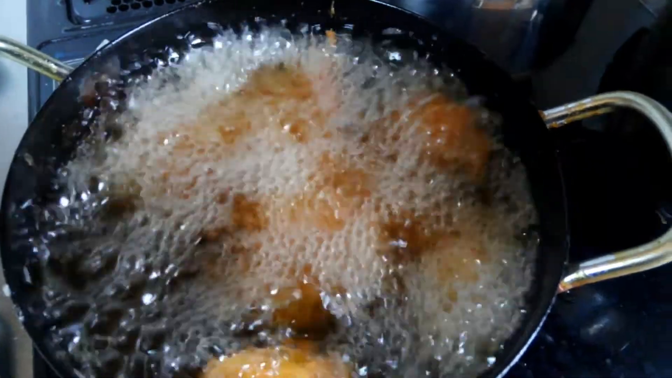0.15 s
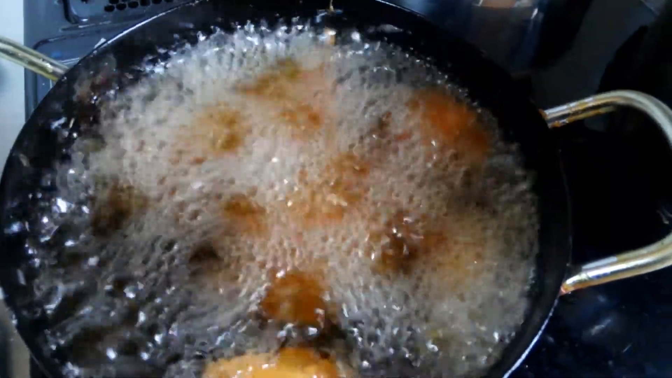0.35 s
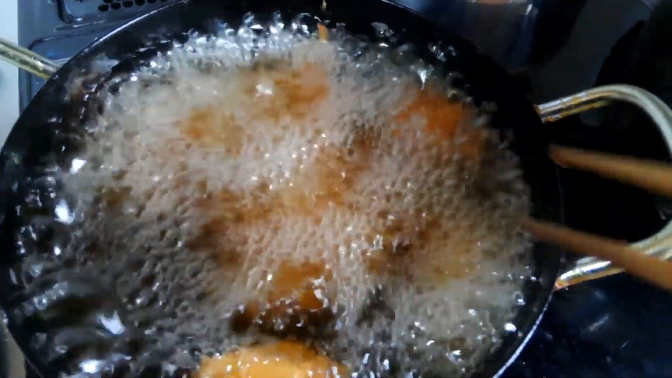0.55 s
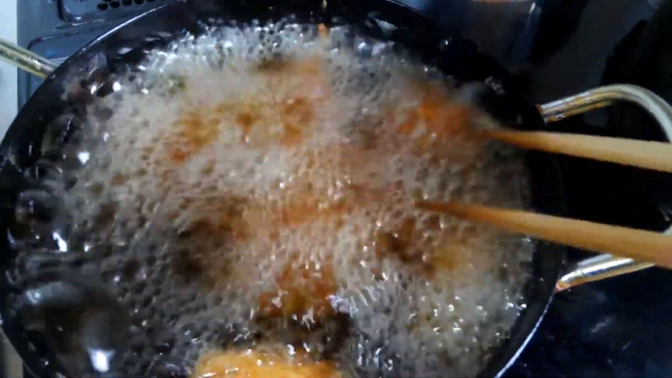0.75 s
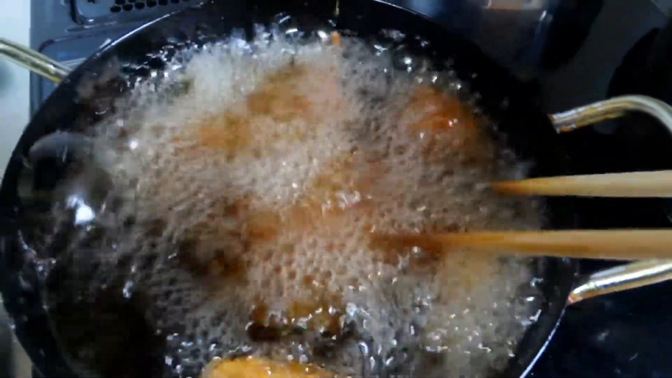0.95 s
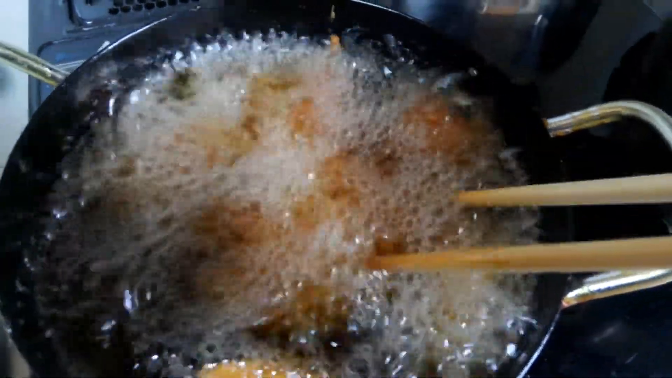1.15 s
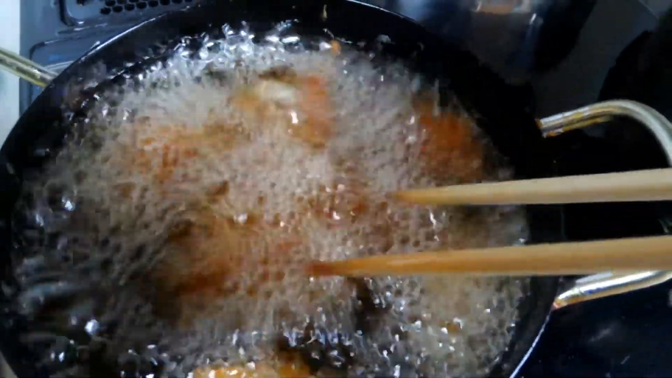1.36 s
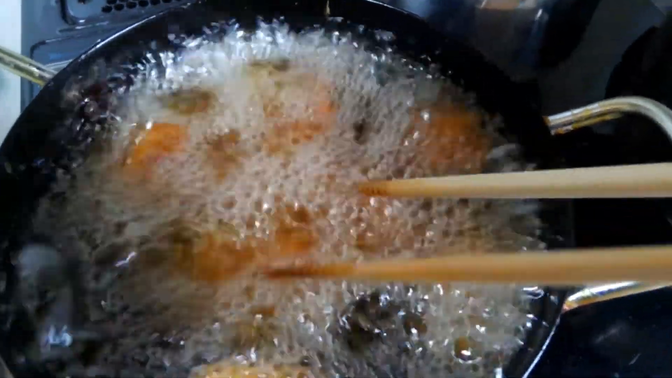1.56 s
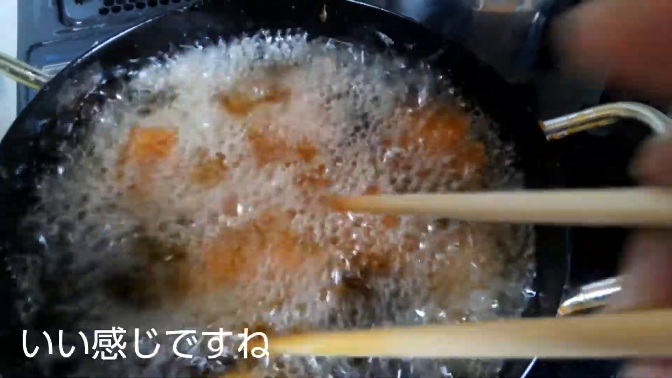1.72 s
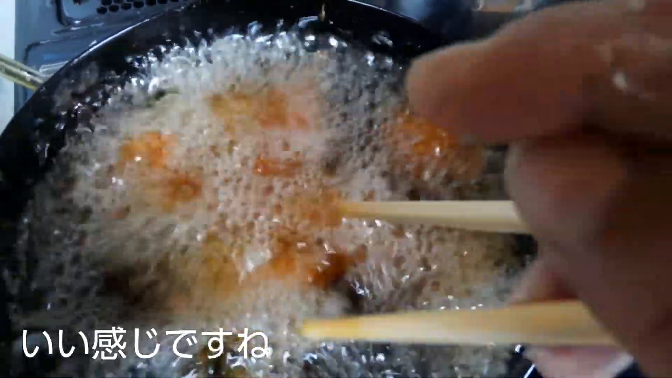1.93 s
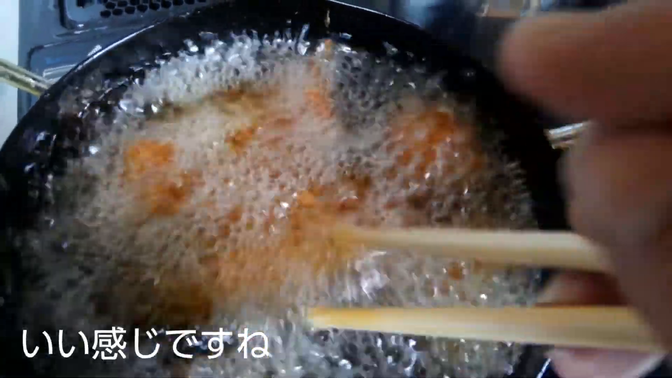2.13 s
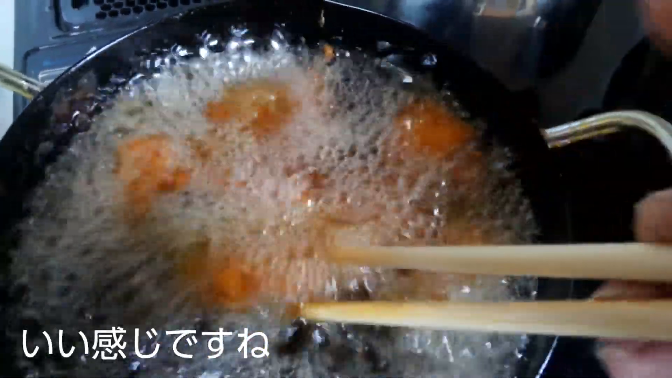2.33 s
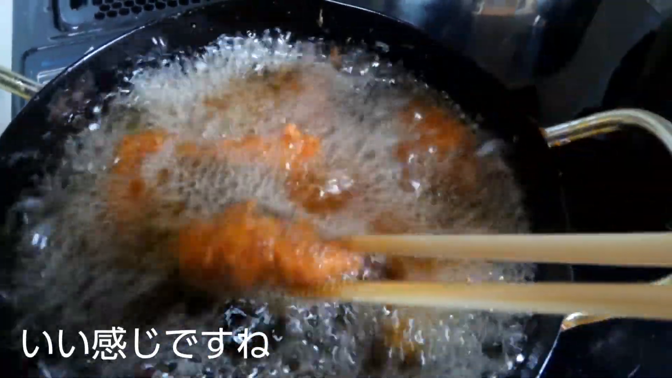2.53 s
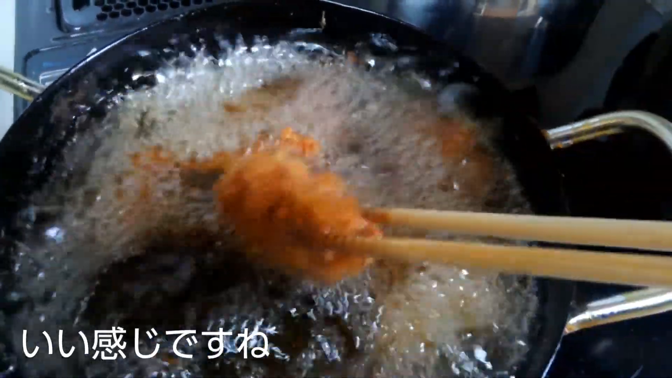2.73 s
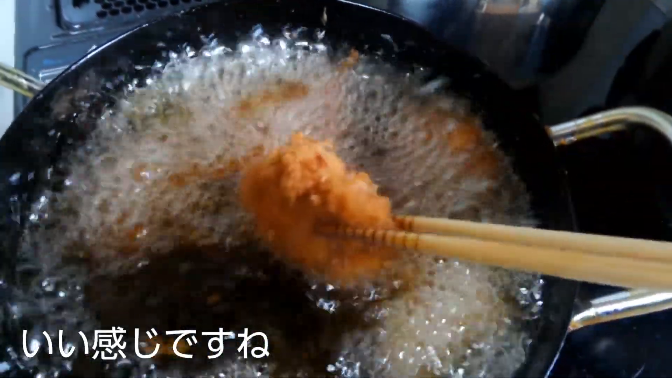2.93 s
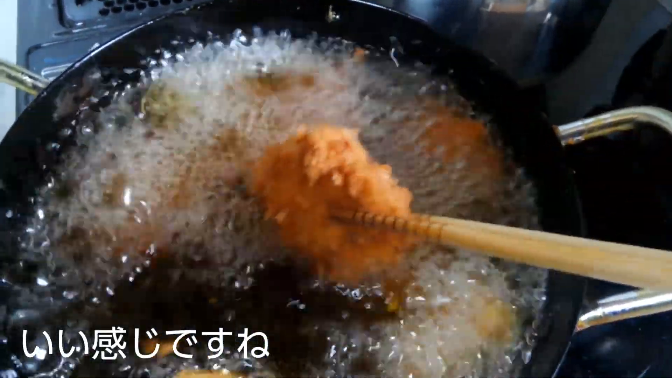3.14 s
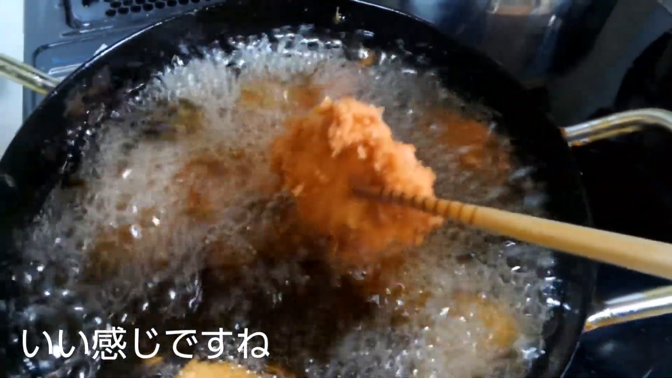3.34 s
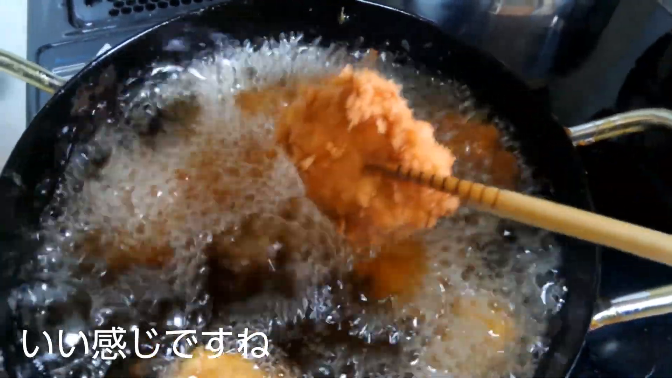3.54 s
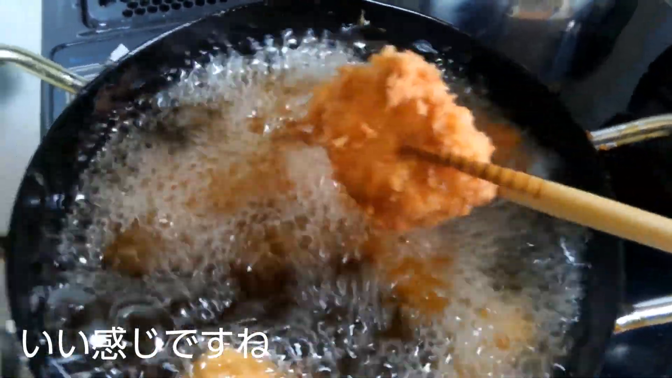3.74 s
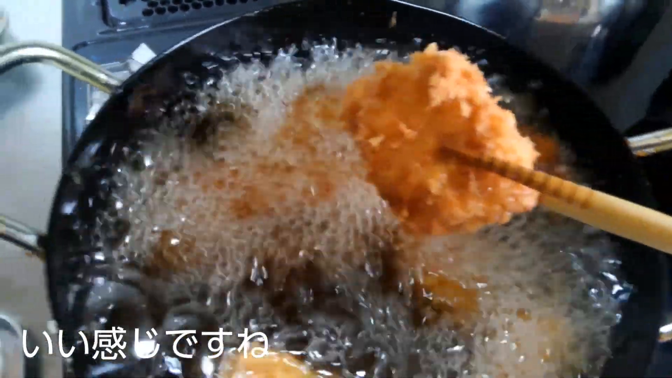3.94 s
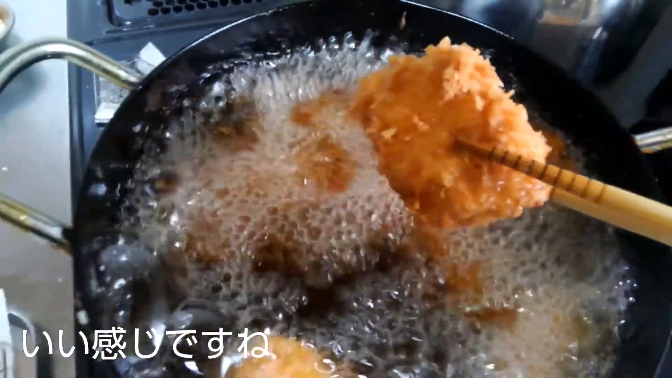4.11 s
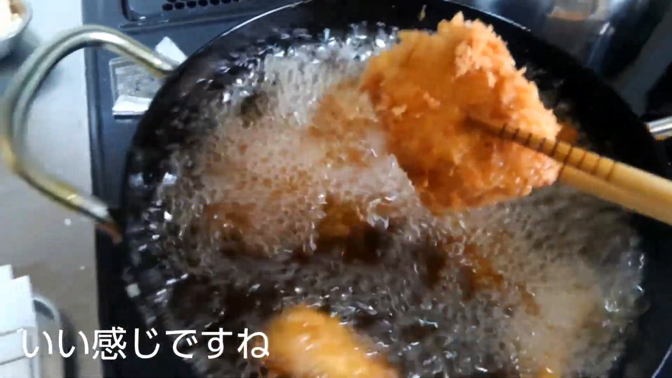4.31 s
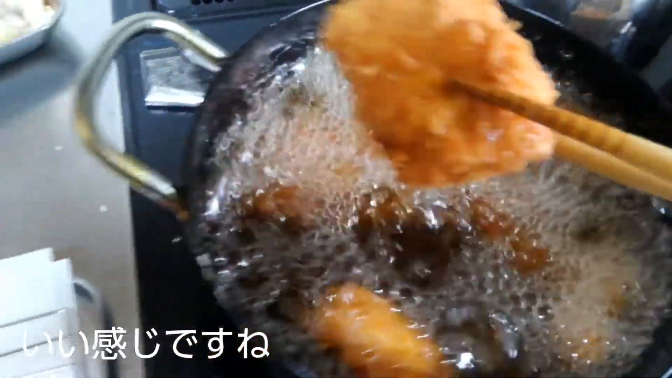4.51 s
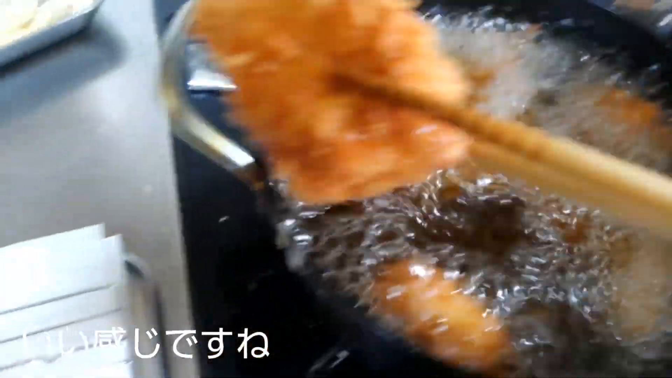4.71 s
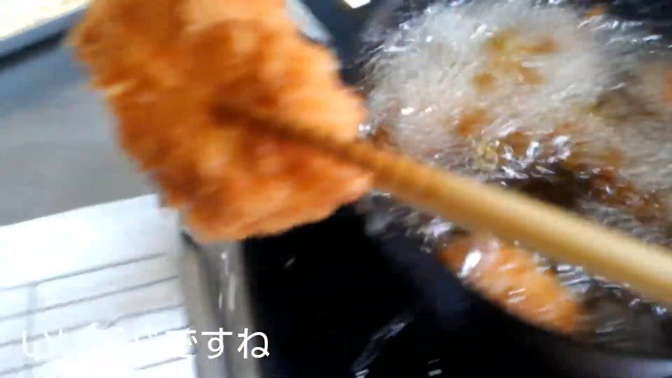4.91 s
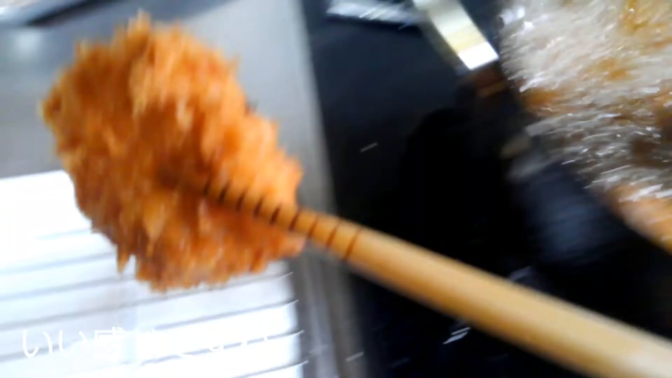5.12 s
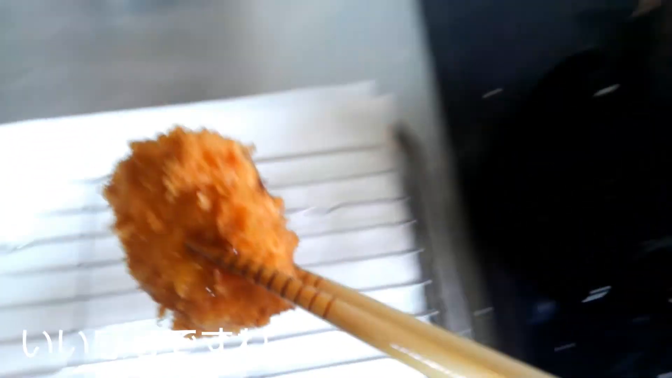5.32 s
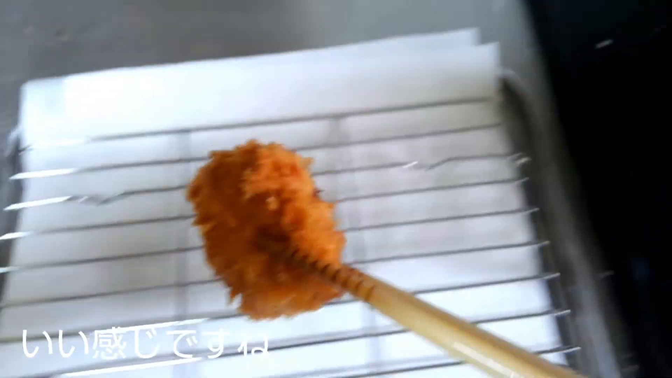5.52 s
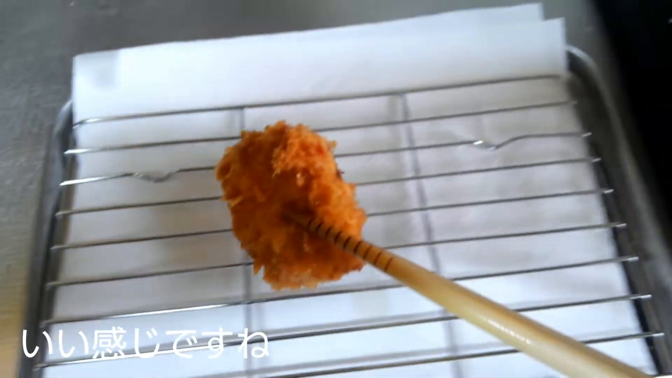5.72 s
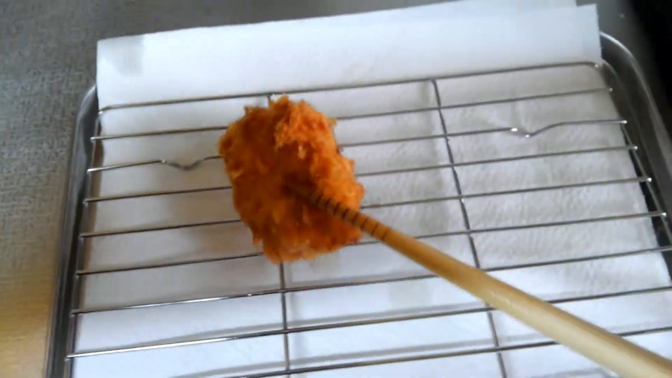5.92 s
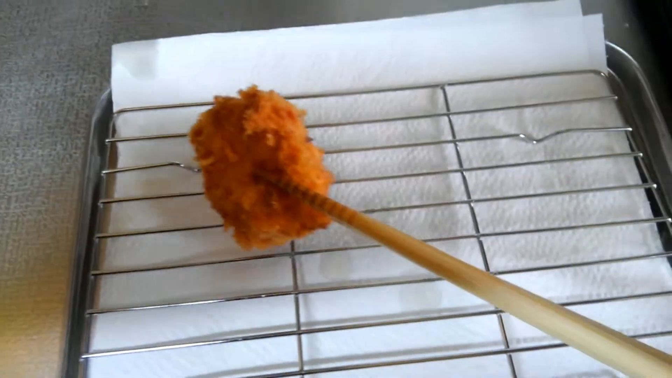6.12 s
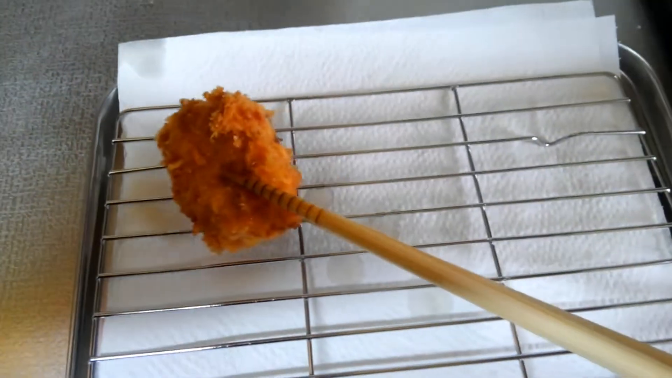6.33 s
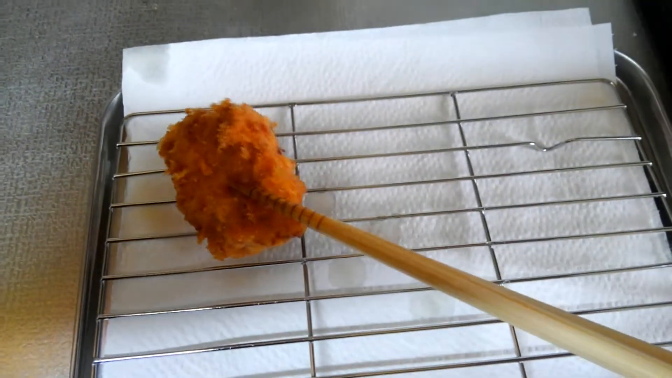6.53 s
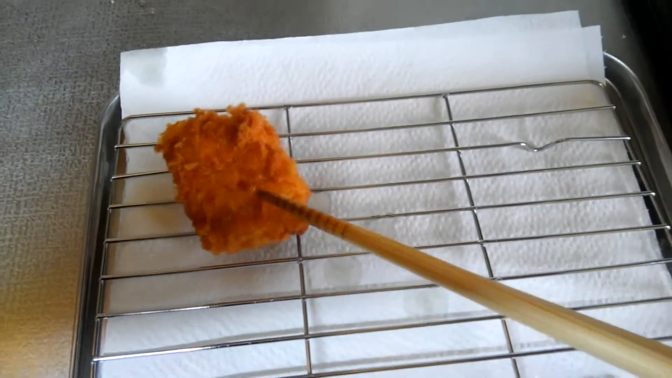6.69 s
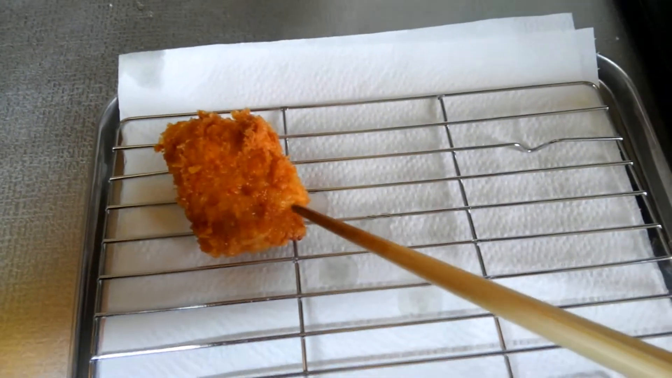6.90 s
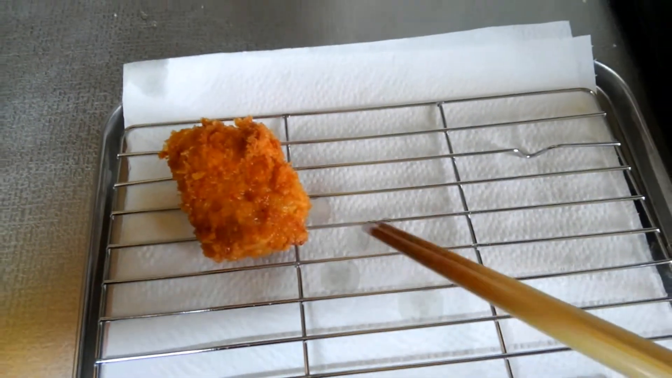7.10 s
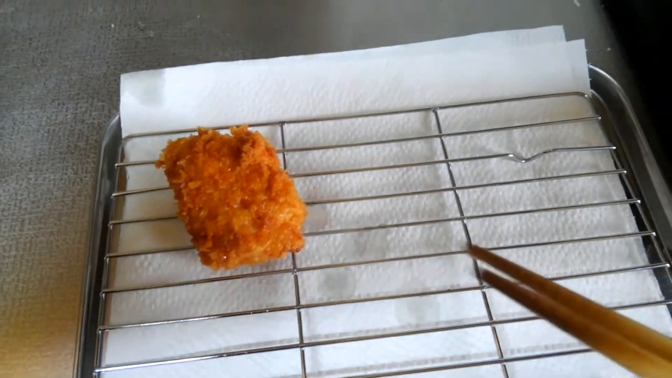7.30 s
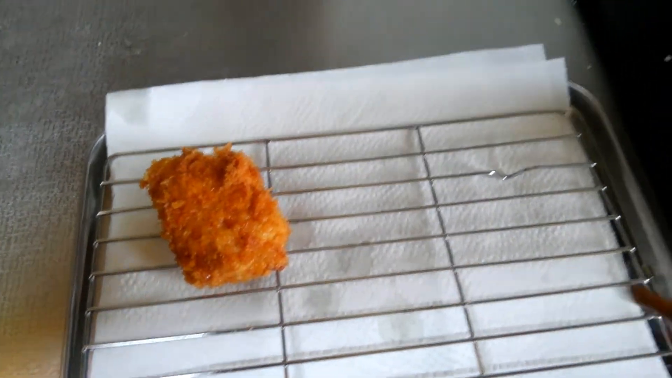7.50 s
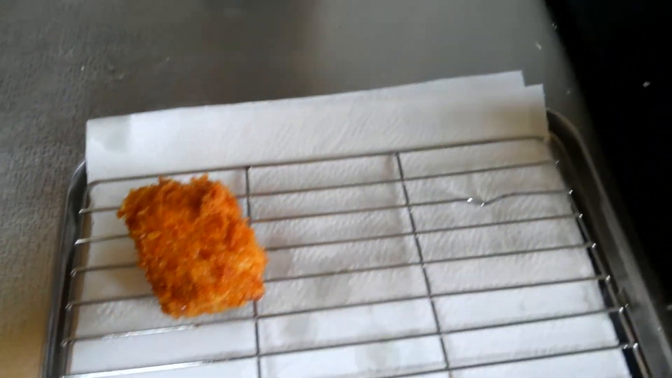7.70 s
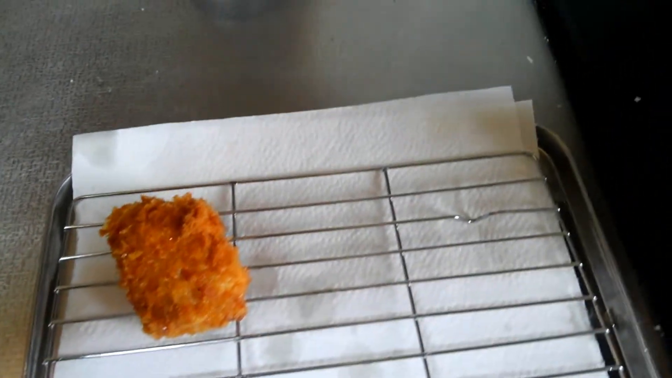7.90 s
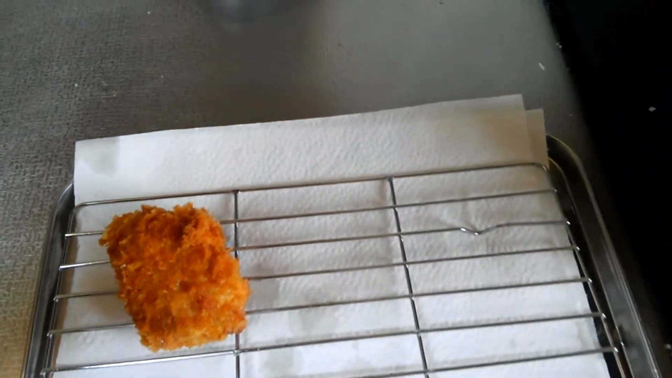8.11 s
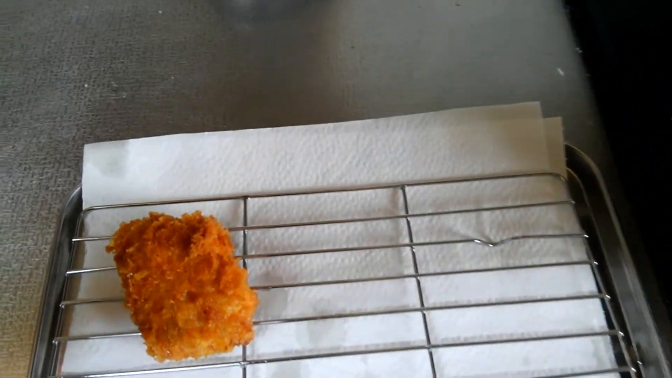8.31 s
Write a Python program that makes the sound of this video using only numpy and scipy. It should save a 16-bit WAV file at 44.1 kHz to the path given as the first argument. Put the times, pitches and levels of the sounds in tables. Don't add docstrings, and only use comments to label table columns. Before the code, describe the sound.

After a brief silence, deep-frying fades in quickly: low bubble pops, high snapping spits and steady fizz, with slight wooden knocks. A dense spray of crackles bursts out when a piece leaves the oil. A handheld close microphone then swings away, so the boil grows duller and quieter in the small dry kitchen, leaving hood rumble, moving air and isolated spits.

```python
import sys
import numpy as np
from scipy import signal
from scipy.fft import rfft, irfft, next_fast_len
from scipy.io import wavfile
from scipy.ndimage import map_coordinates

SR = 44100
rng = np.random.default_rng(int(sys.argv[2]) if len(sys.argv) > 2 else 0)


def transcribe(signal):
    frames = np.atleast_2d(signal).T
    limited = np.clip(frames, -1, 1)
    pcm = np.round(limited * 32767).astype(np.int16)
    wavfile.write(sys.argv[1], SR, pcm)


def decibels_to_gain(level_db):
    exponent = np.asarray(level_db, float) / 20
    return 10 ** exponent


N = 368235

# time_s, pot_level_db, lifted_piece_level_db
OIL_LEVELS = [(0.5, -42, -66), (1.18, -40, -67), (1.39, -40.5, -68), (1.77, -38.5, -55.5),
              (2.18, -39.5, -66), (2.44, -37.5, -44.5), (2.62, -35, -33), (2.85, -37.5, -32),
              (3.12, -38.5, -33.5), (3.3, -34.5, -35), (3.41, -38, -37), (4.54, -41.5, -40.5),
              (5.22, -44, -39.5), (5.62, -46.5, -43.5), (6.2, -46.5, -45), (7.05, -46.5, -45.5),
              (7.4, -43.5, -45.5), (8.35, -45, -50)]
# time_s, hum_level_db, air_level_db
HOOD_LEVELS = [(0.5, -48.5, -53.5), (2.49, -49, -51), (5.86, -50.5, -56.5), (8.35, -49.5, -58)]
# time_s, gain_db
FADE_IN = [
    (0.21, -14.5),
    (0.3, -4),
    (0.4, 1),
    (0.5, 3),
]
# time_s, share_turned (0 to 1)
TURN_AWAY = [
    (4.4, 0),
    (5.5, 1),
]
# time_s, level_db
WHISTLE_SWELL = [(5.6, -1), (5.9, 4), (6.7, 4), (7.3, 3), (7.6, -4)]

# frequency_hz, density_db (per Hz)
BOIL_COLOUR = [(350, -102), (600, -10.5), (1910, 0.5), (2180, 4.5), (4760, -4.5), (6000, -6.5), (7800, -45),
               (13200, -120)]
# frequency_hz, density_db (per Hz)
FIZZ_COLOUR = [(2350, -97), (4000, -8), (5940, -7), (8220, 3.5), (8700, 1), (11500, -14.5), (12500, -19),
               (16200, -23), (22000, -120)]
# frequency_hz, density_db (per Hz)
SPRAY_COLOUR = [(6470, 2), (11000, 9.5), (12600, -21), (14000, 13), (15800, 7.5)]
# frequency_hz, density_db (per Hz)
HUM_COLOUR = [(12, -6), (25, -1.5), (70, -15.5), (110, -3), (142, 2), (205, -15.5), (260, -15),
              (330, -21.5), (580, -26.5), (990, -120)]
# frequency_hz, density_db (per Hz)
AIR_COLOUR = [(180, -37), (300, -25), (430, -13), (775, 1), (936, -5.5), (1070, 1), (1500, 5.5), (1950, 1),
              (3300, -120)]
# pitch_hz, width_hz, level_db (rms), change_once_turned_db
HOOD_TONES = [
    (2125, 20, -58.5, 0),
    (1070, 60, -70, 0),
    (480, 35, -72, -2),
    (395, 25, -76, 0),
    (785, 40, -69, -16),
]
# frequency_hz, decay_s (time to fall 60 dB)
ROOM_DECAY = [(500, 0.1), (2500, 0.062), (8000, 0.033), (15000, 0.012)]
# frequency_hz, gain_db
POP_COLOUR = [(400, -10), (1100, 4), (9500, 3.5), (12500, 3.5), (16000, -15)]
# frequency_hz, gain_db
CRACK_COLOUR = [(700, -30), (1800, 6), (8000, 7), (12000, -14), (16000, -18)]

# crest_s, peak_db, pitch_hz
POT_SPITS = [(0.41, -16, 7600), (0.4811, -9.5, 5120), (0.5176, -17.5, 7800), (0.6672, -13, 8000),
             (0.7541, -17.5, 8260), (0.8664, -10, 7960), (0.9172, -15, 7100), (1.1911, -11.5, 8200),
             (1.2156, -13.5, 7460), (1.3216, -11.5, 7750), (1.6435, -13.5, 6940), (1.8693, -8.5, 6160),
             (1.9767, -15, 5300), (2.126, -10.5, 5470), (2.244, -16, 6000), (2.4307, -9.5, 8200),
             (2.4526, -7, 8400), (4.5587, -19, 5020), (4.6611, -13.5, 7400), (4.9795, -14, 7450),
             (5.1048, -14, 8100), (5.1767, -9.5, 7560), (5.6194, -11.5, 7300), (5.7978, -16, 6600),
             (5.837, -13, 7260), (6.4841, -12, 7100), (6.6298, -12, 7000), (6.858, -15, 7440),
             (6.8826, -3.5, 7860), (7.4047, -13, 7600)]
# crest_s, peak_db, pitch_hz
LIFTED_SPITS = [(2.5781, -8, 6550), (2.5875, -10, 7040), (2.6, -4, 7850), (2.647, -8, 7850),
                (2.6614, -1.5, 7540), (2.6634, 4, 8270), (2.762, -13, 5840), (2.806, -9.5, 8250),
                (2.845, -4, 8660), (2.853, -9, 8400), (2.8602, -8, 8300), (2.931, -9, 8350),
                (2.9587, -8, 6900), (2.965, -11, 8550), (3.049, -9, 8500), (3.0772, -4.5, 8200),
                (3.106, -8, 8900), (3.1328, -9, 5660), (3.1424, -5.5, 7060), (3.1485, -5.5, 8200),
                (3.172, -9, 7850), (3.2044, -6.5, 7740), (3.2413, -4.5, 8200), (3.323, -5.5, 8850),
                (3.4537, -10, 6350), (3.6776, -6.5, 6150), (3.7822, -15, 8200), (3.972, -13, 7500),
                (4.165, -15, 8800), (4.2123, -17, 7300)]
# crest_s, peak_db, pitch_hz
DRAINING_SPITS = [(0.228, -29, 7600), (0.266, -29, 6800), (0.599, -18, 8600), (0.3614, -18, 8900),
                  (0.6634, -16.5, 6040), (0.8447, -16.5, 8300), (1.071, -21, 10000), (1.3162, -14.5, 8600),
                  (3.3038, -12, 6450), (3.4046, -15, 8300), (3.447, -12, 7500), (3.554, -18, 8400),
                  (3.5928, -11.5, 7870), (3.6049, -14, 6000), (3.637, -14, 7970), (3.6497, -13, 5760),
                  (3.659, -13, 8900), (3.684, -10, 7360), (3.7346, -14, 8100), (3.8661, -17, 6260),
                  (3.9517, -15, 8100), (3.966, -16, 7820), (3.9793, -11, 7960), (3.986, -13.5, 5700),
                  (3.992, -13, 7500), (4.199, -12.5, 7200), (4.2042, -15, 7500), (4.2338, -17, 9500),
                  (4.2767, -13, 7800), (4.36, -14, 7840)]
# crest_s, peak_db, pitch_hz
MIDDLING_SPITS = [(0.4243, -21, 6840), (0.7946, -24, 5860), (0.8574, -24, 6400), (0.885, -19, 7600),
                  (1.0407, -25, 7300), (1.0978, -17.5, 6400), (1.1622, -19.5, 5750), (1.2626, -22, 4830),
                  (1.3727, -18.5, 6340), (1.6729, -25, 10000), (1.6811, -18, 6960), (1.838, -14.5, 8250),
                  (1.8493, -16, 6670), (2.1032, -18, 7500), (2.1194, -18, 6270), (2.1604, -21, 5170),
                  (2.1955, -12, 6530), (2.32, -18, 7900), (2.4098, -16, 5400), (2.496, -13.5, 6240),
                  (2.5072, -14, 7260), (2.704, -11, 8200), (2.762, -14, 7900), (2.9584, -10, 8440),
                  (2.984, -15, 8680), (3.0401, -17, 8290), (3.0897, -17, 8570), (3.1258, -13, 8000),
                  (3.1785, -16, 8030), (3.3369, -27, 8440), (3.4293, -15, 8000), (3.4883, -21, 7860),
                  (3.5985, -18, 8630), (3.6639, -14, 7950), (3.7602, -17, 7000), (3.7942, -16, 9300),
                  (3.8581, -17, 7800), (3.8737, -16, 8760), (3.958, -19, 7820), (4.0308, -12, 7400),
                  (4.0575, -16, 7650), (4.2492, -16, 7350), (4.331, -13, 7900), (4.4714, -22, 8810),
                  (4.4783, -16, 8360), (4.6128, -18, 5450), (4.6837, -15, 7750), (4.768, -14.5, 7900),
                  (4.8854, -18, 7350), (4.969, -12, 7600), (5.0942, -17, 8200), (5.136, -17, 6240),
                  (5.3557, -18, 8200), (5.4117, -14.5, 7260), (6.153, -14.5, 7740), (6.207, -20, 7100),
                  (7.457, -18, 7050), (8.1398, -22, 7210)]
# crest_s, peak_db, pitch_hz
QUIET_SPITS = [(0.395, -27, 8720), (0.4871, -21, 8500), (5.872, -16, 7840), (5.9722, -22, 8790),
               (6.6987, -20, 5400), (6.7671, -15, 8000), (6.9076, -19, 6700), (7.0106, -19, 5370),
               (7.1862, -27, 7560), (7.2232, -19, 6600), (7.2461, -24, 7430), (7.3425, -18, 8000),
               (7.6006, -29, 6740), (7.7427, -25, 7160), (7.7815, -17.5, 6780), (7.7948, -16, 7300),
               (7.8074, -26, 4890), (8.1075, -21, 5300), (8.1259, -21, 6400), (8.2712, -29, 7100)]
# crest_s, peak_db, pitch_hz
NEAR_BUBBLES = [(0.434, -20, 2870), (0.5302, -14.5, 4330), (0.547, -22, 2900), (0.7946, -14.5, 2670),
                (0.9544, -19, 2460), (1.0963, -14.5, 3740), (1.3686, -18, 2830), (1.5826, -11.5, 3200),
                (1.65, -21, 4200), (1.748, -22, 4930), (1.8098, -17.5, 2900), (1.9443, -21, 4260),
                (1.9832, -9.5, 2780), (2.2484, -14.5, 2750), (2.2722, -15.5, 2320), (2.373, -17.5, 3870),
                (2.4978, -18, 2800), (2.5223, -15.5, 2600), (2.5982, -8.5, 3660), (2.6232, -12, 3370),
                (2.6817, -15, 3700), (2.6893, -11, 2850), (2.7788, -16, 2070), (3.2406, -13.5, 4200),
                (3.3214, -13.5, 2900), (3.3425, -26.5, 1700), (3.4481, -24, 1770), (3.4531, -15, 2580),
                (3.5677, -7, 4100), (3.7433, -14, 4200), (3.78, -12, 2460), (3.8849, -15, 2700),
                (3.886, -16.5, 1670), (3.9366, -18, 2120), (4.1503, -19.5, 1550), (4.4315, -19, 4400),
                (4.438, -15.5, 2860)]
# crest_s, peak_db, pitch_hz
TURNED_BUBBLES = [(0.2867, -27.5, 2650), (0.732, -21, 4040), (8.159, -26, 1860), (4.343, -23, 3580),
                  (4.357, -19, 3270), (4.379, -25.5, 1500), (4.5006, -21.5, 2540), (5.825, -25, 2620),
                  (5.876, -27, 2780), (6.186, -28, 1760), (4.482, -17.5, 3170), (4.559, -22, 4500),
                  (4.8859, -23, 4140), (5.002, -23, 1950), (5.169, -18.5, 2920), (5.343, -19.5, 2350),
                  (5.4125, -19, 1760), (5.799, -24, 2770), (5.8614, -22.5, 2100), (6.1981, -25, 2100),
                  (6.6296, -19, 2830), (6.646, -19.5, 1850), (6.857, -19.5, 2780), (6.8825, -16, 3040),
                  (7.3564, -15.5, 2340), (7.407, -20.5, 2500), (7.5192, -14.5, 2080), (7.6502, -17.5, 2550),
                  (7.714, -19, 3770), (7.808, -15, 2580), (8.0686, -15, 2660)]
# crest_s, peak_db, pitch_hz
MIDDLING_BUBBLES = [(0.4178, -26, 2910), (0.6217, -22, 2860), (0.9174, -22, 3430), (1.141, -25, 2520),
                    (1.156, -26, 2700), (1.177, -24, 3230), (1.2003, -22, 2650), (1.397, -20, 2870),
                    (1.41, -21, 4260), (1.5187, -19, 2970), (1.551, -20, 2330), (1.703, -23, 3000),
                    (1.998, -26, 3600), (2.117, -16, 4140), (2.223, -20.5, 4200), (2.3371, -19.5, 2720),
                    (2.3933, -20, 3960), (2.4898, -19, 2430), (2.6476, -18, 3500), (2.667, -14, 2890),
                    (2.7039, -17, 3320), (2.7363, -21, 3320), (2.8595, -19.5, 2530), (3.013, -21, 2820),
                    (3.106, -18.5, 4370), (3.142, -21.5, 3040), (3.1895, -26, 2860), (3.2583, -23, 1770),
                    (3.286, -24.5, 1660), (3.2967, -23, 2410), (3.3813, -18.5, 4070), (3.4872, -21, 3530),
                    (3.5251, -29, 4220), (3.675, -17.5, 3600), (3.7712, -23, 2130), (3.8342, -24, 2950),
                    (3.8416, -23, 3100), (3.942, -26, 3100), (4.1567, -25, 1600), (4.4698, -20, 3030),
                    (4.6658, -23, 2170), (4.8536, -25.5, 1680), (4.967, -30, 2920), (4.974, -22, 3750),
                    (5.2188, -25, 2800), (5.376, -20, 2730), (5.39, -22, 4020), (5.4253, -25, 2940),
                    (6.1279, -24.5, 2900), (6.596, -33, 2840), (7.291, -21.5, 3010), (7.4635, -20, 3070),
                    (7.5655, -20.5, 2580), (7.8313, -25, 2700)]
# crest_s, peak_db, pitch_hz
QUIET_BUBBLES = [(0.3103, -29, 2860), (0.357, -27, 3340), (1.3189, -27, 2270), (5.6521, -23, 3240),
                 (5.7906, -25, 3270), (5.822, -23, 2200), (5.926, -26, 2760), (6.673, -22.5, 2880),
                 (6.9627, -26.5, 2380), (7.2124, -25.5, 2860), (7.247, -28, 2280), (7.3068, -31, 2540),
                 (8.0753, -27, 2760), (8.316, -24, 2900)]
# crest_s, peak_db
DROPLETS = [(0.598, -19), (0.8505, -29), (1.2151, -25), (1.8693, -20), (2.4304, -16), (2.4522, -27),
            (2.587, -13), (2.6473, -12), (2.9644, -17), (2.985, -16), (3.1071, -9), (3.1328, -15),
            (3.1887, -16), (3.4543, -20), (3.5923, -19), (3.6825, -17), (3.7341, -18), (3.9793, -20),
            (4.1642, -24), (4.2117, -19), (4.3509, -24.5), (5.6193, -24), (5.7979, -18), (6.208, -31),
            (6.63, -29), (6.768, -33.5)]
# start_s, peak_db
EXPLOSIONS = [(0.7923, -23), (2.8436, -24), (3.1715, -23), (4.885, -20.5), (5.2385, -39), (5.452, -25),
              (6.181, -28), (6.218, -28), (6.4845, -31), (6.5966, -22), (6.6296, -19.5), (6.8577, -19),
              (6.8822, -14.5), (7.591, -31)]
# crest_s, peak_db, pitch_hz
KNOCK_HITS = [(2.0291, -32, 261), (2.03, -33.5, 520), (2.0291, -21, 1040), (2.664, -17, 1300),
              (3.3297, -29, 970), (4.5005, -36, 840), (4.51, -26.5, 1380), (4.858, -27, 1640),
              (6.8583, -31, 1500), (6.8821, -33, 740), (5.1253, -15, 5300), (6.8826, -25, 5000),
              (6.6294, -22, 3600), (6.858, -22, 5900), (6.8814, -30, 1500)]
# start_s, length_s
LEAN_MOMENTS = [(0.371, 0.047), (0.508, 0.1), (0.807, 0.055), (1.06, 0.041), (1.171, 0.035), (1.302, 0.029),
                (1.677, 0.07), (1.84, 0.02), (2.005, 0.02), (2.147, 0.035), (2.432, 0.028), (2.59, 0.023),
                (2.665, 0.02), (2.745, 0.105), (3.083, 0.05), (3.15, 0.087), (3.318, 0.041), (3.795, 0.023),
                (3.858, 0.041), (4.283, 0.023), (4.347, 0.035), (4.954, 0.023), (5.096, 0.035),
                (5.787, 0.035), (5.992, 0.1), (6.623, 0.012), (6.835, 0.041), (8.128, 0.023)]


def unit(x):
    return x / np.sqrt(np.mean(x ** 2) + 1e-20)


def along(points, hz):
    f, v = np.transpose(points)
    return np.interp(np.log(hz + 1), np.log(f + 1), v)


def curves(rows):
    s, *cols = np.transpose(rows)
    return [np.interp(np.arange(N) / SR, s, c) for c in cols]


def share_turned():
    return curves(TURN_AWAY)[0]


def wobble(rate):
    return map_coordinates(rng.standard_normal(N // 100), [np.arange(N) * rate / SR])


def filtered(x, response):
    m = next_fast_len(N + 8192)
    return irfft(rfft(x, m) * response(np.fft.rfftfreq(m, 1 / SR)), m)[:N]


def coloured(x, spectrum):
    return unit(filtered(x, lambda hz: decibels_to_gain(along(spectrum, hz))))


def skewed(draw, spread_db):
    return decibels_to_gain(-spread_db * np.log(draw).clip(-3, 0))


def random_places(draw, weight):
    density = np.cumsum(weight)
    return np.searchsorted(density / density[-1], draw).clip(0, N - 1)


def scattered_pitch(low_hz, high_hz, a, b):
    return low_hz * (high_hz / low_hz) ** ((a + b) / 2)


def rings(s, peak, hz, cycles, rise, size):
    cycles = (cycles + 0 * s)[:, None]
    swell = np.minimum(2.6, 1.3 * cycles)
    turn = np.arange(size) / SR * hz[:, None] - swell
    opening = np.sin(np.pi / 2 * (1 + turn / swell).clip(0, 1)) ** 2
    dying = np.exp(-(turn.clip(0) / cycles) ** 0.76)
    shape = opening * dying * np.linspace(1, 0, size)
    tone = np.cos(2 * np.pi * turn * (1 + rise * turn / cycles))
    signed_peak = peak * (-1) ** np.arange(len(s))
    wave = signed_peak[:, None] * shape * tone
    start = np.round((s - swell[:, 0] / hz) * SR).astype(int).clip(0)
    at = start[:, None] + np.arange(size)
    return np.bincount(at.ravel(), wave.ravel(), N + size)[:N]


def crackle(count, spread_db, surge, share):
    draw = rng.random((count, 3))
    at = random_places(draw[:, 0], np.exp(surge))
    size = skewed(draw[:, 1], spread_db) * np.sign(draw[:, 2] - .5)
    grains = unit(np.bincount(at, size, N))
    return np.sqrt(share) * grains + np.sqrt(1 - share) * rng.standard_normal(N)


def small_bubbles(count, low_hz, high_hz, spread_db, cycles, surge):
    draw = rng.random((count, 5))
    s = random_places(draw[:, 0], np.exp(surge)) / SR
    hz = scattered_pitch(low_hz, high_hz, draw[:, 2], draw[:, 3])
    size = skewed(draw[:, 1], spread_db)
    return unit(rings(s, size, hz, cycles * (.5 + draw[:, 4]), rise=0.043, size=240))


def louder_sum(a_db, b_db):
    return 10 * np.log10(decibels_to_gain(a_db) ** 2 + decibels_to_gain(b_db) ** 2)


def oil_levels():
    pot_db, piece_db = curves(OIL_LEVELS)
    fizz_db = louder_sum(pot_db - 3, piece_db)
    spray_db = louder_sum(pot_db - 38, piece_db - 8.5)
    return pot_db, fizz_db, spray_db


def lesser(level_db, count, over_db, spread_db, low_hz, high_hz):
    draw = rng.random((count, 4))
    level_db = level_db + curves(FADE_IN)[0]
    at = random_places(draw[:, 0], decibels_to_gain(.5 * level_db + 2 * wobble(12)))
    hz = scattered_pitch(low_hz, high_hz, draw[:, 2], draw[:, 3])
    return np.transpose([at / SR, level_db[at] + over_db - spread_db * np.sqrt(draw[:, 1]), hz])


def kitchen(x):
    hop = SR // 30
    out = np.zeros(N + SR)
    hz, t, z = signal.stft(rng.standard_normal((N // hop + 1, SR // 8)), SR, nperseg=128)
    decay = decibels_to_gain(-60 * t / along(ROOM_DECAY, hz)[:, None])
    tails = signal.istft(z * decay, SR, nperseg=128)[1]
    for k, tail in enumerate(tails):
        answer = signal.fftconvolve(x[k * hop:(k + 1) * hop], tail / np.linalg.norm(tail))
        out[k * hop + 40:][:len(answer)] += answer
    return out[:N]


def frying():
    boil_db, fizz_db, spray_db = oil_levels()
    away = share_turned()
    sputter = wobble(170)
    low_surge = .28 * wobble(30) + .5 * sputter + .4 * wobble(150)
    high_surge = .3 * wobble(25) + .7 * sputter + .5 * wobble(220)

    boil = 0.78 * coloured(crackle(count=5000, spread_db=5.0, surge=low_surge, share=0.67), BOIL_COLOUR)
    boil = boil + 0.45 * small_bubbles(count=1500, low_hz=1534, high_hz=6150, spread_db=6.0,
                                       cycles=4.6, surge=low_surge)

    spatter = crackle(count=5000, spread_db=3.0, surge=high_surge, share=0.55)
    turned_colour = [(.89 * hz, db) for hz, db in FIZZ_COLOUR]
    fizz = (1 - away) * coloured(spatter, FIZZ_COLOUR) + away * coloured(spatter, turned_colour)
    fizz = 0.82 * fizz + 0.57 * small_bubbles(count=2200, low_hz=4200, high_hz=9900, spread_db=2.5,
                                              cycles=3.6, surge=high_surge)

    mist = decibels_to_gain(1.4 * high_surge) * coloured(rng.standard_normal(N), SPRAY_COLOUR)
    spray = 0.5 * coloured(spatter, SPRAY_COLOUR) + 0.19 * mist
    spray_db = spray_db - 2.0 - 3.5 * away + 0.075 * (spray_db + 56)

    oil = decibels_to_gain(boil_db - 2.5) * boil
    oil = oil + decibels_to_gain(fizz_db - 3.0 + 1.2 * wobble(13)) * fizz
    oil = oil + decibels_to_gain(spray_db) * spray
    return decibels_to_gain(-2.5 * away) * oil + decibels_to_gain(-11.5 + 4.4 * away) * kitchen(oil)


def hood():
    hum_db, air_db = curves(HOOD_LEVELS)
    hum = decibels_to_gain(hum_db + 1.2 * wobble(14)) * coloured(rng.standard_normal(N), HUM_COLOUR)
    air = decibels_to_gain(air_db - 5.0) * coloured(rng.standard_normal(N), AIR_COLOUR)
    away = share_turned()
    swell_db = curves(WHISTLE_SWELL)[0] + 1.0 * wobble(8)
    tones = np.zeros(N)
    for hz, width, db, turned_db in HOOD_TONES:
        noise = rng.standard_normal(N)
        tone = unit(filtered(noise, lambda f: 1 / (1 + (2 * (f - hz) / width) ** 2)))
        tones += decibels_to_gain(db + turned_db * away + swell_db * (hz > 2000)) * tone
    return hum + air + tones


def spits():
    fizz_db = oil_levels()[1]
    more = lesser(fizz_db, count=480, over_db=15, spread_db=8, low_hz=5260, high_hz=10540)
    rows = [POT_SPITS, LIFTED_SPITS, DRAINING_SPITS, MIDDLING_SPITS, QUIET_SPITS, more]
    s, db, hz = np.vstack(rows).T
    late = rng.random((len(s), 3))
    db = db - 4.1 * np.interp(s, *np.transpose(TURN_AWAY))
    ring = rings(s, decibels_to_gain(db - 3.5), hz, cycles=1.9 + 2.1 * late[:, 2] ** 2, rise=0.0068, size=160)
    snap = rings(s - .0001, decibels_to_gain(db - 13), 0.7 * hz, cycles=.7, rise=0, size=80)
    splash_s = s + 0.0007 + 0.0035 * late[:, 0]
    splash = rings(splash_s, decibels_to_gain(db - 12.0 - 51.0 * late[:, 1]), hz, cycles=3.3, rise=0.0072, size=160)
    return ring + snap + splash


def bubbles():
    boil_db = oil_levels()[0]
    more = lesser(boil_db, count=280, over_db=11.5, spread_db=9, low_hz=1823, high_hz=4730)
    s, db, hz = np.vstack([NEAR_BUBBLES, TURNED_BUBBLES, MIDDLING_BUBBLES, QUIET_BUBBLES, more]).T
    late = rng.random((len(s), 3))
    away = np.interp(s, *np.transpose(TURN_AWAY))
    db = db - 3.8 * away
    life = (0.98 + 1.3 * late[:, 2]) * (1 + 0.36 * away)
    ring = rings(s, decibels_to_gain(db - 2.5), hz, cycles=life, rise=0.0088, size=600)
    snap = rings(s - .0002, decibels_to_gain(db - 11), 1.56 * hz, cycles=.6, rise=0, size=120)
    splash_s = s + 0.00113 + 0.0064 * late[:, 0]
    splash = rings(splash_s, decibels_to_gain(db - 22 - 21 * late[:, 1]), hz, cycles=1.2, rise=0.031, size=400)
    return ring + snap + splash


def ticks():
    s, db = np.transpose(DROPLETS)
    late = rng.random((3, len(s)))
    out = np.zeros(N)
    for k in range(3):
        hz = 11500 + 3500 * late[k]
        out += rings(s + .0012 * k * late[k], decibels_to_gain(db + 2 - 3.3 * k), hz, cycles=.9, rise=0, size=60)
    return out


def cracks():
    s, db = np.transpose(EXPLOSIONS)
    step = np.arange(400)
    decay_db = 60 * step / SR / 0.0068
    wave = decibels_to_gain(db[:, None] - 4.0 - decay_db) * rng.standard_normal((len(s), len(step)))
    at = np.round(s * SR).astype(int)[:, None] + step
    burst = np.bincount(at.ravel(), wave.ravel(), N)
    return filtered(burst, lambda hz: decibels_to_gain(along(CRACK_COLOUR, hz)))


def knocks():
    s, db, hz = np.transpose(KNOCK_HITS)
    life = 1.1 + 0.79 * (np.abs(hz - 1200) < 150)
    return rings(s, decibels_to_gain(db), hz, cycles=life, rise=0, size=900)


def scene():
    dulled = filtered(bubbles() + spits(), lambda f: decibels_to_gain(along(POP_COLOUR, f)))
    pops = dulled + ticks() + knocks() + cracks()
    echoes = decibels_to_gain(-10.5 + 2.9 * share_turned()) * kitchen(pops)
    steady = decibels_to_gain(curves(FADE_IN)[0]) * (frying() + hood())
    mono = pops + echoes + steady
    return np.array([mono, mono])


def stereo_flicker(mono, margin, depth):
    band_edges_hz = np.geomspace(4000, 16500, 24)
    hz, t, z = signal.stft(mono, SR, nperseg=1024)
    band = np.searchsorted(band_edges_hz, hz)
    lean = np.zeros(z.shape)
    for s, length in LEAN_MOMENTS:
        share = depth * rng.uniform(-1, 1, len(band_edges_hz) + 1)[band]
        during = (t > s - margin) & (t < s + length + margin)
        lean += np.outer(share * (hz > 4940), during)
    return signal.istft(z * lean, SR, nperseg=1024)[1][:N]


def low_pass(x):
    return signal.sosfilt(signal.butter(12, 16970, fs=SR, output="sos"), x)


def record(dry):
    start_s, top_hz = 0.2135, 15850
    mono = dry[0] / (1 + np.abs(dry[0] / .7) ** 4) ** (1 / 4)
    mono = filtered(mono, lambda hz: .003 * (hz < 16900) + (hz < top_hz))
    mono = mono * np.clip((np.arange(N) / SR - start_s) * 1000, 0, 1)
    side = stereo_flicker(mono, margin=.001, depth=.68)
    return low_pass(np.array([mono + side, mono - side]))


dry = scene()
out = record(dry)
transcribe(out)
```